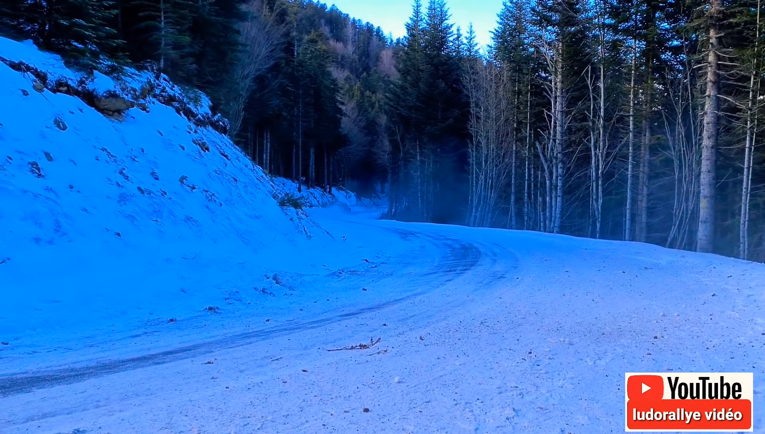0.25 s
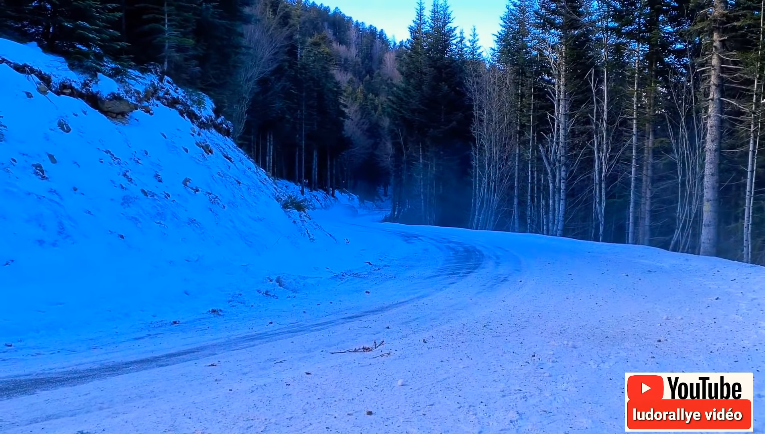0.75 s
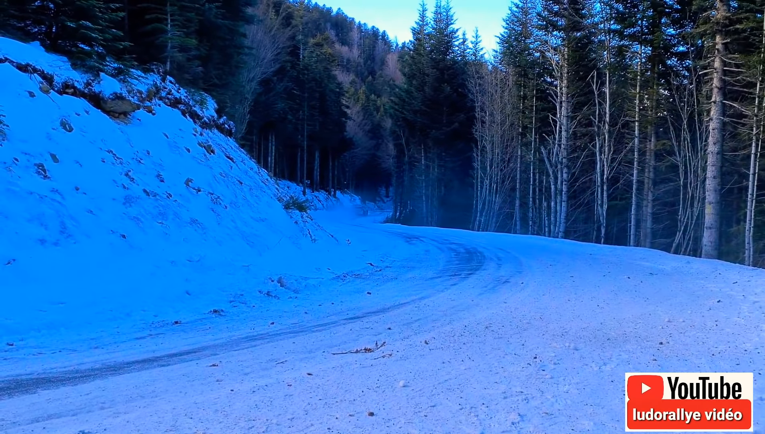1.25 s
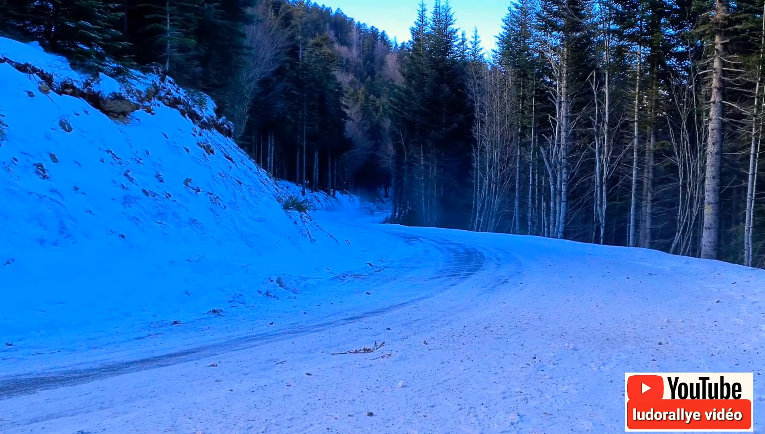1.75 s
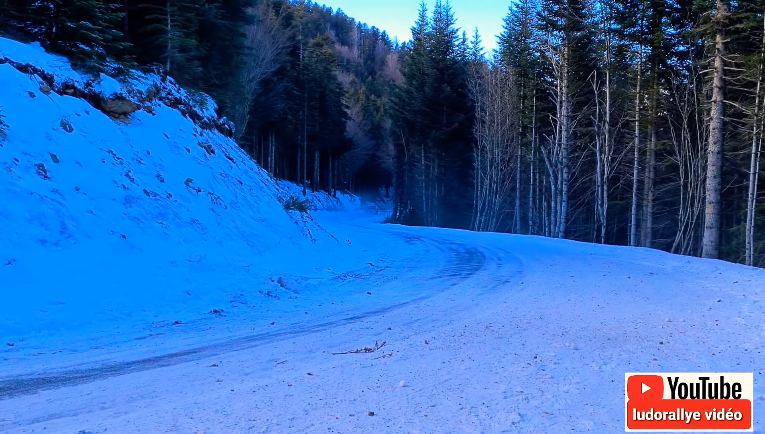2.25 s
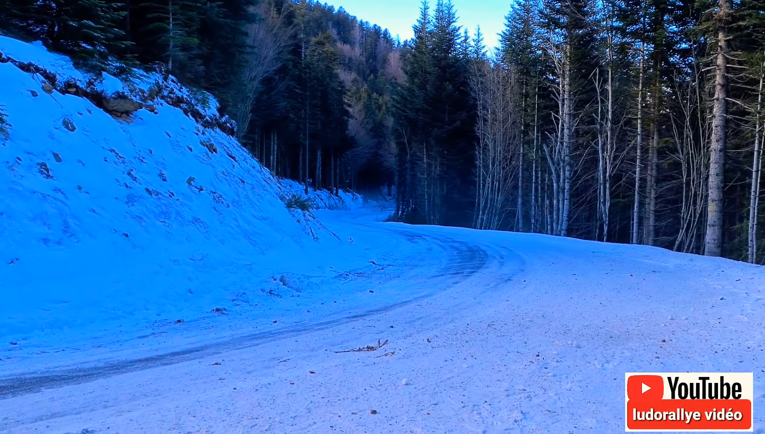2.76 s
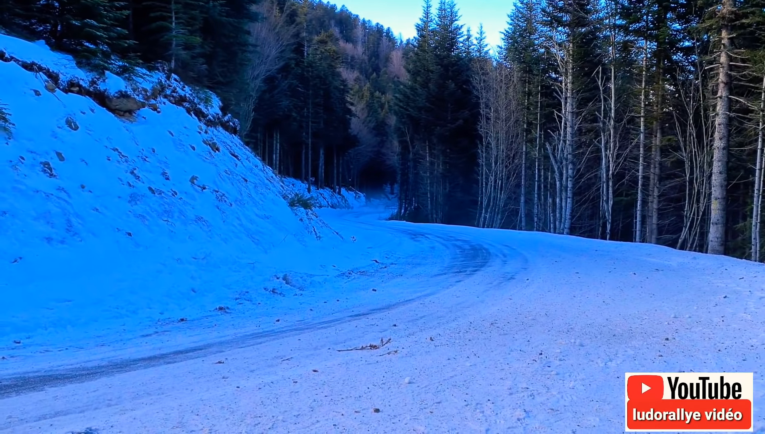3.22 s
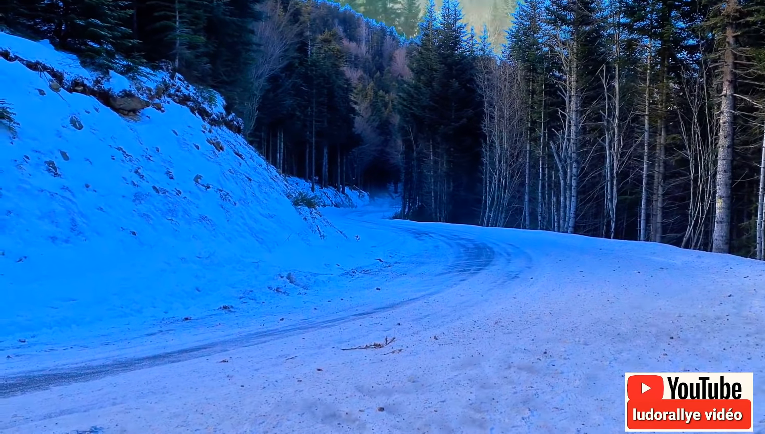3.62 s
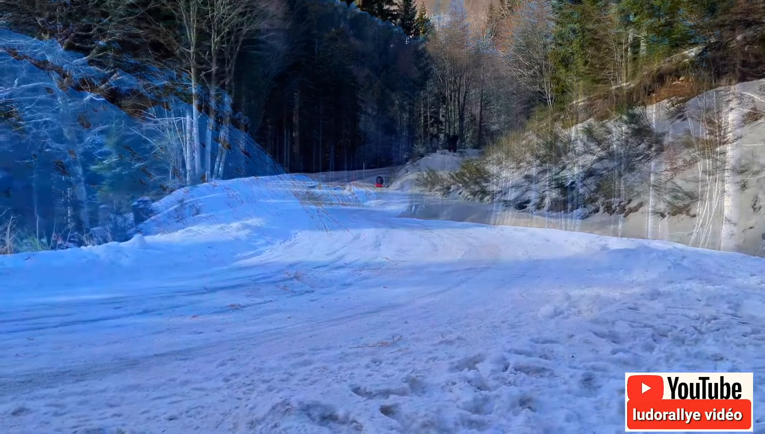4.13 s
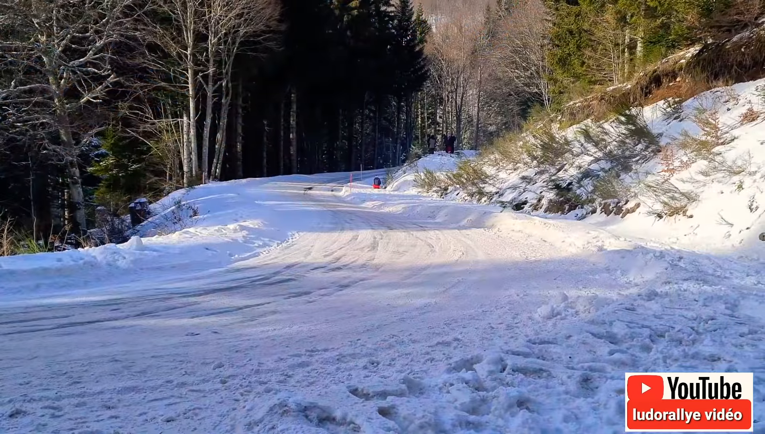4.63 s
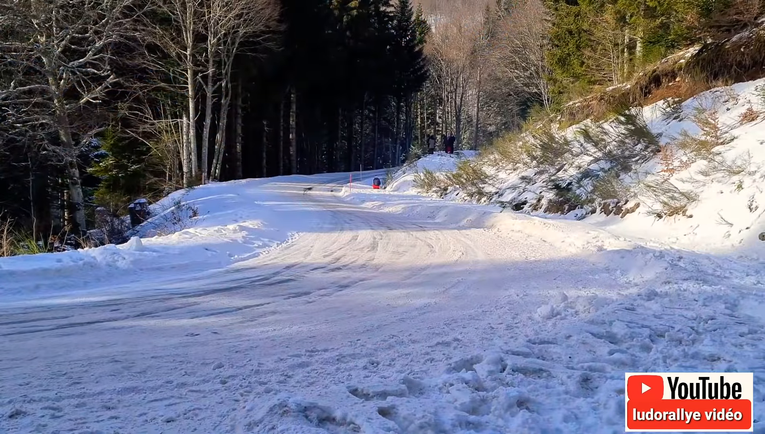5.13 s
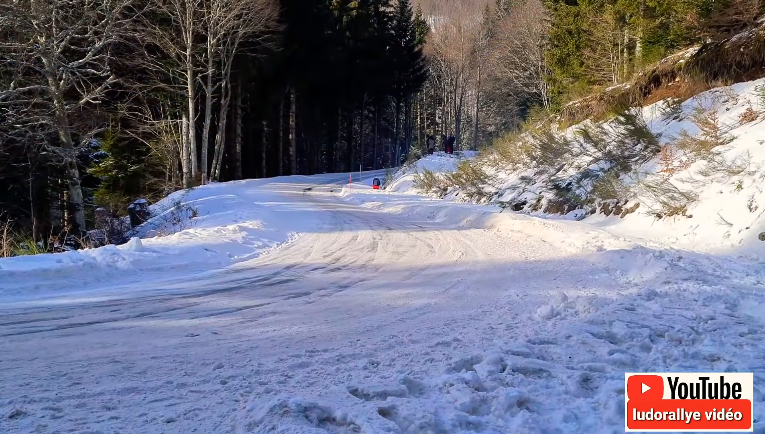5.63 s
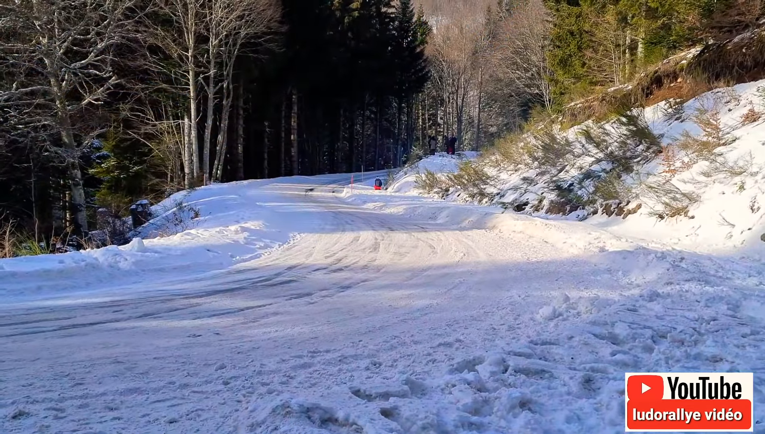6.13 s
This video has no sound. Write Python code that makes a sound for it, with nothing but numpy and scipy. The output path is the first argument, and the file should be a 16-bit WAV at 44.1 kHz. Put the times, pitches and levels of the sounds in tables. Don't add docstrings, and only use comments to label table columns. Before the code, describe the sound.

A rally car at full throttle snarls near the microphone on a snowy forest road, studs scraping ice and gas hissing. A gear change cracks loudly, the engine drops lower and pulls again, then lifts off in a volley of backfires fading to a ragged burble. The scene dissolves to a breezier bend; wind thumps the microphone and a second car rises from far away, cutting off abruptly.

```python
import sys
import numpy as np
from scipy import signal
from scipy.fft import rfft, irfft, next_fast_len
from scipy.io import wavfile
from scipy.ndimage import uniform_filter1d

SR = 44100
rng = np.random.default_rng(int(sys.argv[2]) if len(sys.argv) > 2 else 0)


def pcm_store(signal):
    levels = np.round(np.clip(np.atleast_2d(signal), -1, 1) * 32767)
    wavfile.write(sys.argv[1], SR, levels.astype(np.int16).T)


def boost(x):
    u = np.asarray(x, float) / 20
    return 10 ** u


N = 281358

# start_s, firing_hz, level_db, tailpipe_towards_us (0-1)
GEAR_PULLS = [
    [(0.0, 228.8, -20.5, 0.6), (0.12, 229.7, -20.5, 0.31), (0.17, 220.3, -23, 0.56),
     (0.24, 212.3, -22, 0.24), (0.44, 212.1, -19, 0.3), (0.53, 214.8, -17.5, 0.05),
     (0.565, 206.8, -18, 0.62), (0.61, 219.6, -19, 0.2), (0.65, 208.3, -18.5, 0.55),
     (0.86, 226.1, -21.5, 0.86), (1.035, 222.9, -22, 1), (1.07, 202.2, -19.5, 0.81),
     (1.24, 196, -21.5, 0.65), (1.35, 200.8, -18.5, 0.7), (1.42, 204.3, -20, 0.42), (1.55, 210, -20, 0.87),
     (1.82, 217.7, -24.5, 1), (1.838, 210.8, -40, .95), (1.85, 208, -37, .95)],
    [(1.875, 170, -30.5, .9), (1.91, 158.7, -26.5, 1), (1.978, 185.1, -24.5, 0.99),
     (2.026, 167.2, -25, 0.95), (2.07, 182.1, -26.5, 0.97), (2.124, 174.5, -24, 0.97),
     (2.16, 181.9, -23, 0.53), (2.2, 173.8, -21.5, 0.8), (2.25, 185.1, -21, 0.6),
     (2.31, 180.9, -21.5, 0.96), (2.37, 188.7, -20.5, 0.88), (2.434, 176.2, -19, .7),
     (2.478, 191.5, -19.5, 0.71), (2.528, 176.2, -18.5, 0.72), (2.598, 191, -20, 0.76),
     (2.65, 182.6, -18, 0.61), (2.694, 190, -20.5, 0.92), (2.755, 183.3, -21.5, 0.98)],
]
# pitch_hz, level_db
TALL_GEAR_BARK = [(780, -6.5), (870, 5.5), (930, -4), (1050, -8), (1300, -4), (1450, -8), (1650, -27),
                  (1780, -23), (1900, -10.5), (2100, -26.5), (2600, -39.5), (4000, -68)]
# pitch_hz, level_db (per Hz)
HISS_COLOUR = [(1500, -24), (1900, -9), (2700, -6.5), (3400, -11.5), (4300, -17.5), (4800, -13.5),
               (5400, -17), (6000, -21), (7000, -30), (7900, -34), (9300, -31.5), (11200, -36.5),
               (11700, -44), (15500, -49)]
TURNED_AWAY_DB = -13
TURNED_AWAY_BARK = 0.63


def near_car(mix):
    # pitch_hz, level_db
    boom = [(172, -5.5), (186, -4), (200, -3.5), (228, 7.5)]
    # pitch_hz, level_db
    mouth = [(345, -7), (385, -2), (440, -9), (520, -5.5), (570, 3), (650, 2), (810, 4.5), (885, -6.5)]
    # pitch_hz, level_db
    first_bark = [(780, -7.5), (900, -1), (1000, -3), (1070, -13.5), (1180, -6.5), (1300, -5), (1500, -13),
                  (1680, -27), (1860, -8.5), (1960, -16), (2040, -13.5), (2150, -42), (2600, -39),
                  (4000, -71.5)]
    first, taller = GEAR_PULLS
    add(mix, *engine(first, boom + mouth, first_bark, half_db=-22.5, roar_db=-3.5, bark_db=-6.5,
                     clear=1.0, jitter=0.0065))
    add(mix, *engine(taller, boom + mouth, TALL_GEAR_BARK, half_db=-26.0, roar_db=-5.0, bark_db=-3.5,
                     clear=0.92, jitter=0.013, low_flutter_db=2.0))
    add(mix, *gas(first, under_db=-14.0, treble_db=(-21, -28), follow=0.095))
    add(mix, *gas(taller, under_db=-17.5, treble_db=(-40, -29), follow=0.5))
    wheelspin = [(1.2, -66), (1.27, -40), (1.38, -34.5), (1.58, -40), (1.7, -66.5)]  # start_s, level_db
    add(mix, *hiss(*curve(wheelspin), treble_db=(-22, -21)))
    boost_off = [(1.855, -43), (1.93, -45), (1.99, -65.5)]  # start_s, level_db
    add(mix, *hiss(*curve(boost_off), treble_db=(-13, -15)))
    add(mix, *scrapes())
    backfires(mix)
    add(mix, *overrun())


def engine(rows, tailpipe, bark_colour, half_db, roar_db, bark_db, clear, jitter,
           thin_hz=150, low_flutter_db=2.5):
    t, hz, level_db, aim = curve(rows)
    size = len(t)
    hz = uniform_filter1d(hz, size=700)
    loss_db = TURNED_AWAY_DB * (1 - aim)
    turns = np.cumsum(hz * (1 + jitter * wander(size, span=0.0091))) / SR

    def order(k, flutter_db):
        drift = 0.14 * wander(size, span=0.074)
        flutter = boost(flutter_db * wander(size, span=0.011))
        return np.sqrt(2) * flutter * np.cos(2 * np.pi * (k * turns + rng.random() + drift))

    low = np.zeros(size)
    for k, loss_share in ((1, 0), (2, 0.25), (3, 1), (4, 1)):
        order_db = level_db + read(tailpipe, k * hz) + loss_share * loss_db
        low += boost(order_db) * order(k, 1.2 if k == 1 else low_flutter_db)
    halves = sum(order(k + 0.5, flutter_db=2.0) for k in (1, 2, 3))

    puff = 0.21 + np.exp(-(turns % 1) / 0.62)
    roar = evened(pipe(puff * rng.standard_normal(size)))
    roar = signal.sosfilt(signal.butter(2, thin_hz, "high", fs=SR, output="sos"), roar)

    upper = evened(sum(boost(read(bark_colour, k * hz)) * order(k, flutter_db=3.7) for k in range(5, 14)))
    rasp = coloured(puff * rng.standard_normal(size), bark_colour)
    edge = evened(sum(boost(read(HISS_COLOUR, k * hz)) * np.cos(2 * np.pi * (k * turns + rng.random()))
                      for k in range(9, 26)))
    edge = edge * boost(2.2 * wander(size, span=0.036))
    bark = clear * upper + 0.44 * rasp + 0.055 * edge

    sound = low + boost(level_db + half_db) * halves
    sound += boost(level_db + loss_db) * boost(roar_db) * roar
    sound += boost(level_db + bark_db + TURNED_AWAY_BARK * loss_db) * bark
    return t[0], sound * signal.windows.tukey(size, 0.0083 / (t[-1] - t[0]))


def pipe(x):
    # pitch_hz, width_hz, level_db
    resonances = [(244, 135, 3), (504.4, 17, -2.5), (643, 110, 4.5), (739, 62, 7), (1232, 183, 2.5),
                  (1780, 100, -27.5)]
    out = np.zeros(len(x))
    for hz, width, db in resonances:
        r = np.exp(-np.pi * width / SR)
        ring = signal.lfilter([1, 0, -1], [1, -2 * r * np.cos(2 * np.pi * hz / SR), r * r], x)
        out += boost(db) * (1 - r) * ring
    return signal.sosfilt(signal.butter(4, 2300, fs=SR, output="sos"), out)


def gas(rows, under_db, treble_db, follow):
    t, hz, level_db, aim = curve(rows)
    level_db = level_db + follow * (level_db - level_db.max())
    turns = np.cumsum(hz * (1 + 0.022 * wander(len(t), span=0.013))) / SR
    loss_db = TURNED_AWAY_BARK * TURNED_AWAY_DB * (1 - aim)
    start, sound = hiss(t, level_db + under_db + loss_db, treble_db)
    return start, sound * evened(1 + 0.6 * np.cos(2 * np.pi * turns))


def hiss(t, level_db, treble_db):
    size = len(t)
    x = coloured(rng.standard_normal(size), HISS_COLOUR)
    dull = signal.sosfiltfilt(signal.butter(3, 5600, fs=SR, output="sos"), x)
    low = signal.sosfiltfilt(signal.butter(3, 3100, fs=SR, output="sos"), x)
    flicker_db = 1.9 * wander(size, span=0.008)
    body = low * boost(3.6 * wander(size, span=0.04))
    body += (dull - low) * boost(3.4 * wander(size, span=0.007))
    near_db = np.linspace(*treble_db, size)
    treble = (x - dull) * boost(near_db + 22.0 + 2.0 * wander(size, span=0.02) + 0.7 * flicker_db)
    return t[0], (body + treble) * boost(level_db + flicker_db)


def scrapes():
    # start_s, peak_db, length_s
    bursts = [(0.097, -34.5, 0.014), (0.173, -32, 0.014), (0.413, -35, 0.014), (0.549, -32.5, 0.018),
              (0.667, -27, 0.0094), (0.724, -32.5, 0.017), (0.8924, -27.5, 0.019), (0.969, -32, 0.018),
              (1.229, -35, 0.014), (1.388, -36.5, 0.011), (1.476, -35, 0.016), (1.53, -35.5, 0.016),
              (1.708, -41.5, 0.015), (1.76, -38, 0.017), (2.215, -40.5, 0.011), (2.332, -42, 0.011),
              (2.437, -36.5, 0.014), (2.468, -38, .014), (2.676, -33.5, .016)]
    t = np.arange(0, GEAR_PULLS[1][-1][0], 1 / SR)
    shape = sum(boost(db + 1.5) * np.exp(-((t - s - length / 3) / (length / 2)) ** 2)
                for s, db, length in bursts)
    return 0, shape * coloured(rng.standard_normal(len(t)), HISS_COLOUR[1:])


def backfires(mix):
    # start_s, peak_db, crack_db, second_charge (0-1), extra_treble_db
    explosions = [(1.853, 1.5, -15.5, 0.22, 4), (2.738, -9.5, -33.5, 0.2, 0), (2.746, -21, -29, .1, 2),
                  (2.757, 4.5, -12.5, 0.4, 2), (2.7738, 0.5, -13.5, 0.23, 1), (2.81, -6, -23.5, 0.3, -8),
                  (2.822, -1.5, -14.5, 0.32, -5.5), (2.858, -8.5, -37, 0.3, -3), (2.867, -12, -24, .6, -9),
                  (2.911, -13.5, -35, .1, -8), (2.917, -8, -32.5, 0.6, -8), (2.961, -4, -25.5, 0.7, -12),
                  (3.011, -5.5, -26.5, 0.5, -9), (2.978, -15, -32.5, .1, -11), (3.059, -12.5, -38, .1, -10),
                  (3.082, -13, -33, 0, -6), (3.065, -4, -25.5, 0.3, -8.5), (3.101, -15, -47, 0.5, -10),
                  (3.111, -7, -35, 0.8, -11), (3.149, -3.5, -23, 0.27, -1.5), (3.204, -7.5, -40, 0.8, -10),
                  (3.277, -14, -39, 0.3, -10), (3.455, -16, -57, 0.2, -10), (3.484, -25, -47.5, 0.7, -5),
                  (3.536, -22.5, -60, 0, -11), (3.571, -19.5, -60, 0.4, -11), (3.699, -21.5, -57, 0.1, -9),
                  (3.742, -18, -46.5, 0.5, -10), (3.849, -21, -59.5, 0, -8), (3.895, -21.5, -56, 0, -8),
                  (3.964, -20, -57, 0.3, -12), (4.048, -22.5, -58, 0.4, -10), (4.072, -27.5, -53, 0.5, -10),
                  (4.127, -20.5, -65, 0.2, -10), (4.319, -22.5, -59, 0, -13)]
    for row in explosions:
        add(mix, *volley(*row))


def volley(s, peak_db, crack_db, second, extra_db):
    spit_s, second_charge_s = 0.006, 0.0155
    gear_change = s < 2
    second_db = 20 * np.log10(abs(second) + 1e-3)
    treble_db = -27 * np.clip(s - 2.8, 0, 0.5) + 4 * gear_change + extra_db
    out = np.zeros(11000)
    add(out, *pop(0, peak_db - 1.5 + second_db, crack_db - 5.0 + second_db, treble_db))
    add(out, *pop(spit_s, peak_db, crack_db, treble_db, thin_hz=60 if gear_change else 420,
                  burn_s=np.clip(0.03 + 0.12 * second, 0.02, 0.09), shove=4.5 if gear_change else 2.2))
    add(out, *pop(spit_s + second_charge_s, peak_db + second_db, crack_db + 2.0 * second_db, treble_db))
    return s - spit_s, out


def pop(s, peak_db, crack_db, treble_db, thin_hz=420, burn_s=0.063, shove=2):
    # pitch_hz, level_db (per Hz)
    crack_colour = [(1200, -37), (1900, -1), (2300, -8), (3400, -15), (4300, -19), (4800, -13), (5400, -19),
                    (6200, -26.5), (8000, -34.5), (11000, -33.5), (15500, -40.5)]
    t = np.arange(6600) / SR
    burn = rng.standard_normal(len(t)) * boost(-60 * t / burn_s) * np.minimum(t / 0.0022, 1)
    push = np.sin(np.pi * np.minimum(t / 0.0015, 1)) ** 2
    blast = pipe(uniform_filter1d(3.2 * burn, size=22, origin=10) + shove * push)
    blast = signal.lfilter(*signal.butter(1, thin_hz, "high", fs=SR), blast)
    top = [(hz, db + treble_db) for hz, db in crack_colour[8:]]
    crack = coloured(rng.standard_normal(len(t)), crack_colour[:8] + top)
    crack = crack * np.minimum(t / 0.003, 1)
    crack = crack * (boost(-60 * t / 0.022) + 0.013 * boost(-60 * t / 0.32))
    return s + 0.001, boost(peak_db - 2.5) * blast / abs(blast).max() + boost(crack_db + 2.5) * crack


def overrun():
    # start_s, half_width_s, lift_db
    surges = [(3.3, 0.046, 6.5), (3.379, 0.039, 9.5), (3.502, 0.024, 9.5), (3.629, 0.042, 7),
              (3.78, .04, 9), (3.877, .05, 3), (4.324, 0.0063, 10.5)]
    # pitch_hz, level_db (per Hz)
    burble_colour = [(59, -45), (100, -26), (146, -12), (232, -5.5), (327, -10), (369, -4.5), (403, -23),
                     (478, 1.5), (529, -2), (736, 2.5), (1100, -50.5), (1430, -59), (2420, -120)]
    t = np.arange(3.16, 4.37, 1 / SR)
    since, lift_db = t - t[0], humps(t, surges)[0]
    burble_db = -28 - 5 * since + lift_db
    bark_db = burble_db - 10 - 3.5 * since
    hz = 234 - 6.0 * since + lift_db
    count = np.floor(np.cumsum(hz * (1 + 0.039 * wander(len(t), span=0.0092))) / SR)
    strength = np.where(count % 2, 0.35, 1) * boost(2.5 * rng.standard_normal(len(t)))
    fired = np.diff(count, prepend=0) * strength
    for size in (31, 53, 89):
        bounce = np.r_[1, np.zeros(size), -0.6]
        fired = signal.lfilter(bounce[::-1], bounce, fired)
    drive = evened(fired - fired.mean()) + 0.9 * rng.standard_normal(len(t))
    sound = boost(burble_db) * coloured(drive, burble_colour)
    sound += boost(bark_db) * coloured(drive, TALL_GEAR_BARK)
    sound += hiss(t, bark_db - 27 + 0.29 * lift_db, treble_db=(-45, -45))[1]
    return t[0], sound * np.clip(np.minimum(since / 0.02, (t[-1] - t) / 0.12), 0, 1)


def second_car(mix):
    # start_s, firing_hz, level_db, tailpipe_towards_us (0-1)
    climb = [(4.9, 164.4, -62.5, 0.62), (5.3, 168.1, -45.5, 0.82), (5.45, 170.9, -36, 0.8),
             (5.52, 176.8, -35.5, 0.78), (5.63, 172.5, -38, 0.89), (5.69, 177.7, -37, 0.98),
             (5.73, 174.9, -38, 1), (5.8, 189.9, -33, 0.76), (5.85, 194.6, -31, 0.69),
             (5.9, 198.9, -30, 0.51), (5.97, 207.1, -29, 0.76), (6.06, 216.2, -27, 0.93),
             (6.13, 220.1, -28, 0.9), (6.19, 228.1, -25, 0.93), (6.27, 233.7, -24.5, 0.5),
             (6.38, 225.7, -35.5, 0.93)]
    # pitch_hz, level_db
    mouth = [(200, -14), (390, -18.5), (460, -7), (560, -3.5), (650, -1), (710, 1), (825, 10), (862, -7),
             (900, -3.5), (925, -3)]
    # pitch_hz, level_db
    far_bark = [(780, -10), (900, 4), (1050, -6.5), (1200, -13), (1400, -4.5), (1600, -13), (1800, -26.5),
                (2100, -12), (2600, -25.5), (4000, -70)]
    # start_s, level_db
    far_hiss_rows = [(4.9, -80.5), (5.3, -72), (5.5, -53.5), (5.9, -48.5), (6.05, -43.5), (6.28, -44.5),
                     (6.38, -51)]
    # pitch_hz, level_db (per Hz)
    far_hiss_colour = [(2300, -3.5), (3010, -1.5), (3990, -10.5), (4700, -15), (5400, -21.5), (6000, -20.5),
                       (6600, -35), (7550, -48.5)]
    # start_s, level_db
    turbo_rows = [(4.8, -88), (5.0, -70.5), (5.2, -67.5), (5.45, -70.5), (5.7, -71)]
    # pitch_hz, level_db (per Hz)
    turbo_colour = [(2500, -21), (3150, -3), (3400, 2), (3750, -8), (4400, -32.5)]
    # start_s, level_db
    near_top_rows = [(5.5, -91), (5.9, -77.5), (6.05, -63), (6.27, -66), (6.38, -80)]
    # pitch_hz, level_db (per Hz)
    near_top_colour = [(5000, -11.5), (6200, -2), (7200, -7), (9000, -9.5), (9800, -16), (11500, -10),
                       (12500, -23), (14500, -20), (15500, -27)]
    start, sound = engine(climb, mouth, far_bark, half_db=-33.5, roar_db=-0.5, bark_db=2.5,
                          clear=0.63, jitter=0.016, thin_hz=480, low_flutter_db=4.5)
    add(mix, start, sound * boost(-1.5))
    add(mix, start + 0.055, sound * boost(-11.5))
    add(mix, *whine(far_hiss_rows, [(1800, -14)] + far_hiss_colour, patchy_db=2.0))
    add(mix, *whine(turbo_rows, turbo_colour))
    add(mix, *whine(near_top_rows, near_top_colour, patchy_db=2.4))


def high_swell():
    # start_s, level_db
    swell_rows = [
        (3.75, -83),
        (3.95, -68.5),
        (4.2, -64.5),
        (4.32, -77),
    ]
    # pitch_hz, level_db (per Hz)
    swell_colour = [(3000, -12.5), (4400, -8.5), (5300, -1), (6500, -9), (7600, -20), (10300, -22),
                    (11500, -11.5), (12500, -24)]
    return whine(swell_rows, swell_colour)


def whine(rows, colour, patchy_db=1.3):
    t, level_db = curve(rows)
    gain = boost(level_db + patchy_db * wander(len(t), span=0.02))
    return t[0], coloured(rng.standard_normal(len(t)), colour) * gain


def ports(x):
    # pitch_hz, likeness (0-1)
    likeness = [(60, .6), (200, .994), (500, .96), (800, .975), (1300, .9), (1700, .65), (2400, .5),
                (2750, .7), (4500, .55), (6400, .25), (8600, .4), (12000, .25)]
    # pitch_hz, difference_db
    lean = [(100, 0), (300, 0), (1500, -1), (2000, 3), (3000, -1), (4400, -3), (4800, -10), (5500, -9),
            (6500, -1), (8600, 0), (11000, -7)]
    # pitch_hz, phase_rad
    lead = [(1500, 0), (1750, .7), (2250, .7), (2450, -2.5), (2900, -.7), (4500, -.3), (4900, .8),
            (6000, 1.6), (7000, 0)]
    # pitch_hz, level_db
    shared_colour = [(1200, 0), (1400, 1.5), (1850, 0), (2040, 0), (2140, -4), (2260, -2.5), (2380, -1.5),
                     (2470, 3), (2620, 2), (3000, -1), (3400, 2), (3800, 0.5), (11200, -1), (11800, -3)]
    size = next_fast_len(N + SR)
    hz = np.fft.rfftfreq(size, 1 / SR)
    t = np.arange(12000) / SR
    noise = rng.standard_normal((3, 2, len(t)))
    tail = boost(-60 * t / 0.1) + 0.15 * boost(-60 * t / 0.45)
    scatter = noise * boost(-60 * t / 0.035) + uniform_filter1d(noise, size=7) * tail
    scatter = rfft(scatter, size)
    scatter = scatter / np.sqrt(uniform_filter1d(abs(scatter) ** 2, size=4000))
    turn = np.pi * (np.arange(N) / SR / 0.35 / 3 + np.c_[:3] / 3)
    scattered = (rfft(x * np.sqrt(2 / 3) * np.cos(turn), size)[:, None] * scatter).sum(0)
    same = np.clip(read(likeness, hz), 0, 1)
    side = np.array([[0.5], [-0.5]])
    direct = rfft(x, size) * np.sqrt(same) * np.exp(1j * side * read(lead, hz))
    gain = boost(side * read(lean, hz) + read(shared_colour, hz))
    return irfft(gain * (direct + np.sqrt(1 - same) * scattered), size)[:, :N]


def wind():
    # start_s, half_width_s, lift_db, left_right_db
    gusts = [(0.0, 0.0074, 30.5, 5.5), (.3, 0.16, 4.5, -2), (1.1, .2, -6.5, -1), (1.84, 0.082, 5, -1.5),
             (2.25, .2, -3.5, 1), (2.599, 0.085, 5.5, -7), (3.15, .12, 7.5, -2.5), (4.15, 0.11, 3, 2.5),
             (4.84, 0.032, 13.5, -21), (5.26, 0.078, 3, 11), (5.55, 0.05, 2, 6), (6.03, 0.048, 5, 1)]
    # pitch_hz, level_db (per Hz)
    rumble_colour = [(8.8, -36), (15, -15.5), (69, -2), (168, -14), (205, -16.5), (650, -67), (1160, -50),
                     (1540, -48), (1760, -73), (3000, -73), (3900, -99.5), (6600, -120)]
    # start_s, length_s, left_db, right_db
    eddies = [(4.098, 0.046, -43, -16), (4.277, 0.04, -41, -38), (4.328, 0.031, -28, -32),
              (4.405, 0.055, -27.5, -29), (4.455, 0.045, -27.5, -29.5), (4.557, .05, -30.5, -32),
              (4.695, 0.028, -12.5, -19), (4.72, 0.049, -17.5, -14.5), (4.769, 0.022, -51.5, -17.5),
              (4.836, 0.038, -47, -12), (4.949, 0.03, -51, -9.5), (4.991, 0.033, -32, -29),
              (5.107, 0.024, -29.5, -31), (5.215, 0.037, -17, -19), (5.276, 0.078, -18, -19),
              (5.383, 0.045, -26, -32), (5.561, 0.1, -30.5, -37), (5.6, 0.068, -21, -20.5),
              (5.644, 0.038, -21, -28), (5.757, 0.035, -35, -34.5), (5.961, 0.048, -30, -26),
              (5.988, 0.056, -27, -27), (6.18, 0.046, -34, -38), (6.352, 0.035, -25, -50)]
    # pitch_hz, level_db (per Hz)
    eddy_colour = [(18, -29), (30, -4), (228, 1), (457, -6), (1080, -30), (1220, -32.5), (1660, -44),
                   (2300, -54), (3470, -79), (4000, -100), (5200, -119), (8800, -120)]
    t = np.arange(N) / SR
    lift_db, pan_db = humps(t, gusts)
    noise = rng.standard_normal((3, N))
    rumble = coloured(noise[:2] + 1.5 * noise[2], rumble_colour)
    rumble = rumble * boost([3.3 * wander(N, span=0.06), 2.0 * wander(N, span=0.038)])
    breeze_db = np.interp(t, (3.45, 4.16), (-44, -33))
    out = rumble * boost(breeze_db + lift_db + np.array([[0.5], [-0.5]]) * (pan_db - 2))
    for at, length, *db in eddies:
        shape = np.hanning(int(1.62 * length * SR))
        shape = shape * boost(2.0 * wander(len(shape), span=0.0031))
        eddy = coloured(rng.standard_normal((2, 8192)), eddy_colour)[:, :len(shape)] * shape
        eddy = eddy / np.sqrt((eddy ** 2).mean(1, keepdims=True))
        add(out, at - 0.8 * length, eddy * boost(np.c_[db] - 4.0))
    return out


def ticks():
    # start_s, peak_db, left_right_db, pitch_hz, t60_s
    knocks = [(4.212, -41.5, -35, 2900, 0.0065), (4.341, -34, 7, 5141, 0.0004),
              (4.393, -25, 29, 5030, 0.00032), (4.643, -39, -28, 1405, 0.04),
              (4.764, -20.5, -41.5, 76, 0.066), (4.837, -16, -38, 59.4, 0.091),
              (4.847, -23.5, -25, 1330, 0.0049), (4.944, -14.5, -31, 252, 0.029),
              (4.971, -23, -19, 95, .08), (4.685, -32, -2, 704, 0.0095), (4.446, -37, -1, 702, 0.01),
              (5.264, -30, -6, 803, 0.015)]
    out, t = np.zeros((2, N)), np.arange(3000) / SR
    for s, db, pan_db, hz, t60 in knocks:
        attack = np.minimum(t / max(0.42 / hz, t60 / 7), 1)
        ring = boost(db - 60 * t / t60) * np.sin(2 * np.pi * hz * t) * attack
        add(out, s, ring * boost([[pan_db / 2], [-pan_db / 2]]))
    return out


def forest_air():
    # pitch_hz, level_db (per Hz)
    air_colour = [(200, -9), (500, -2.5), (800, -4.5), (1100, -20.5), (2000, -25), (3400, -39),
                  (6000, -47.5), (9500, -65), (15500, -70.5)]
    return boost(-43.5) * coloured(rng.standard_normal((2, N)), air_colour)


def evened(x):
    return x / np.sqrt(np.mean(x ** 2) + 1e-20)


def read(points, hz):
    f, value = np.transpose(points)
    return np.interp(np.log(hz + 1), np.log(f + 1), value)


def coloured(x, colour):
    size = x.shape[-1]
    return evened(irfft(rfft(x) * boost(read(colour, np.fft.rfftfreq(size, 1 / SR))), size))


def wander(size, span):
    width = max(int(span * SR), 2)
    return evened(uniform_filter1d(uniform_filter1d(rng.standard_normal(size), width), width))


def curve(rows):
    s, *columns = np.transpose(rows)
    t = np.arange(s[0], s[-1], 1 / SR)
    return t, *(np.interp(t, s, c) for c in columns)


def humps(t, rows):
    return sum(np.exp(-((t - s) / width) ** 2) * np.c_[height] for s, width, *height in rows)


def add(mix, s, sound):
    part = mix[..., round(s * SR):][..., :sound.shape[-1]]
    part += sound[..., :part.shape[-1]]


def scene():
    cars = np.zeros(N)
    near_car(cars)
    second_car(cars)
    add(cars, *high_swell())
    return ports(cars) + wind() + ticks() + forest_air()


def roll_off(x):
    return signal.sosfilt(signal.butter(12, 15700, fs=SR, output="sos"), x)


def record(dry):
    mix = dry / (1 + abs(dry) ** 6) ** (1 / 6)
    return roll_off(mix)


dry = scene()
out = record(dry)
pcm_store(out)
```